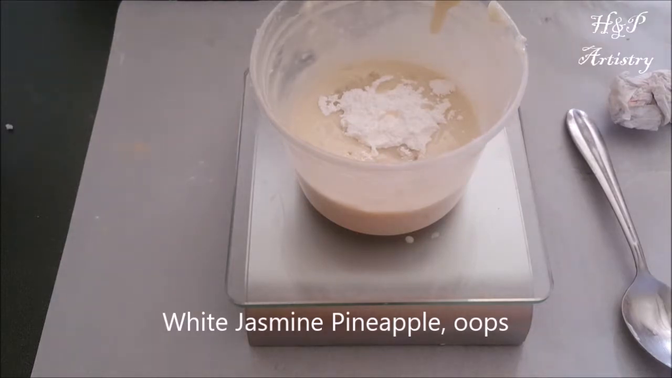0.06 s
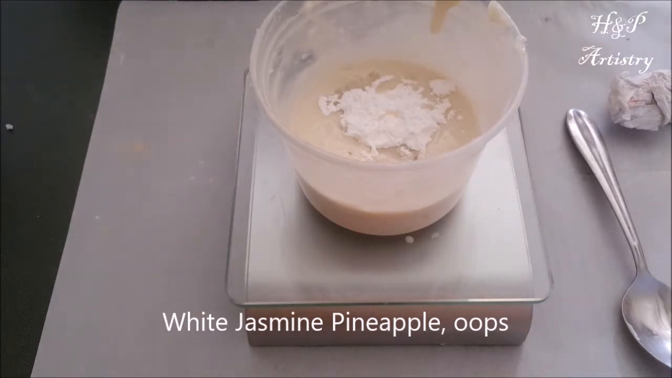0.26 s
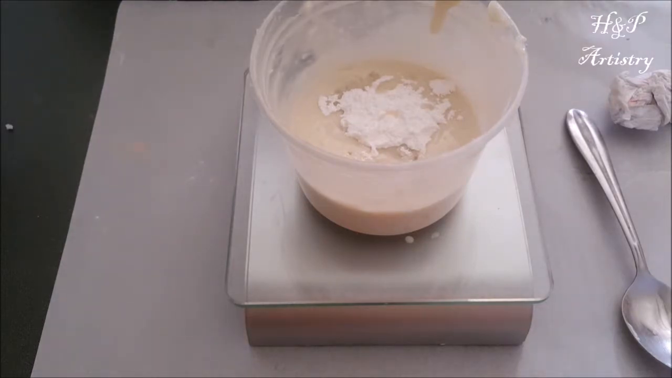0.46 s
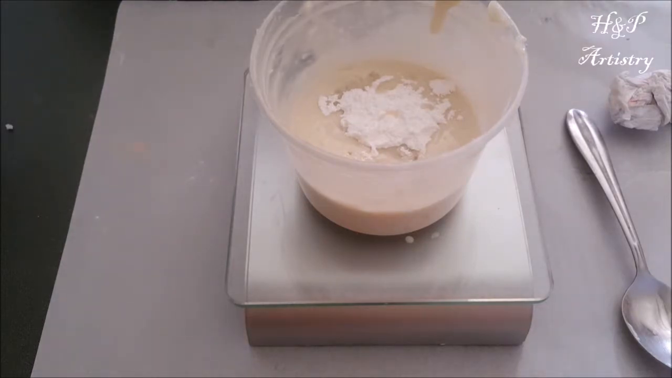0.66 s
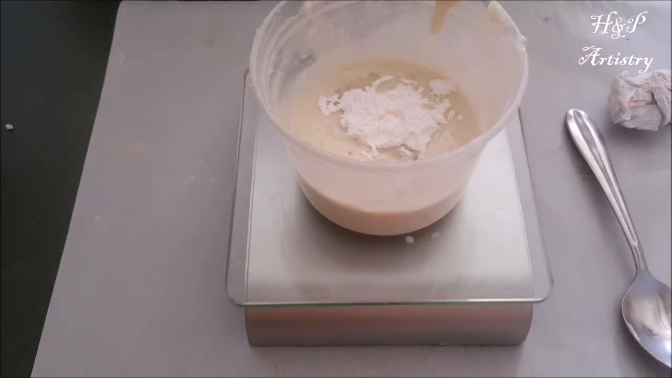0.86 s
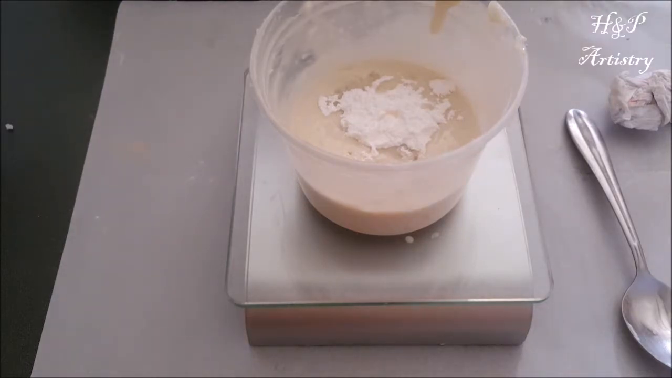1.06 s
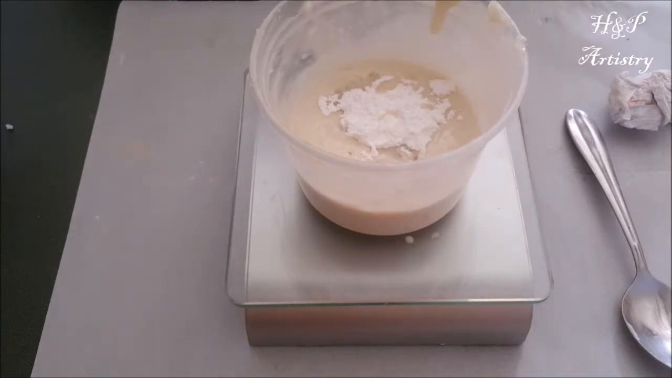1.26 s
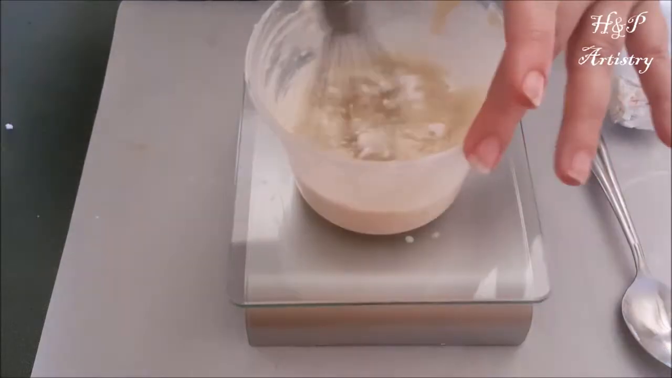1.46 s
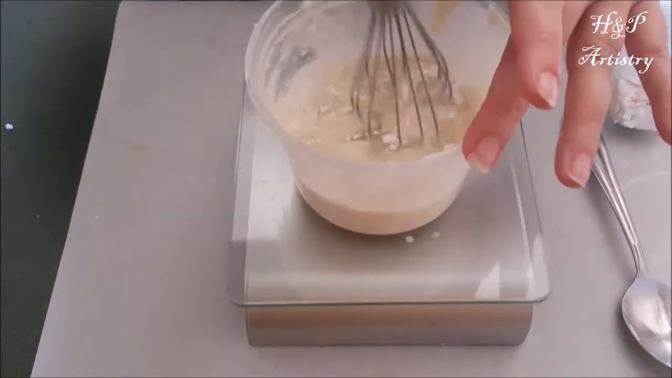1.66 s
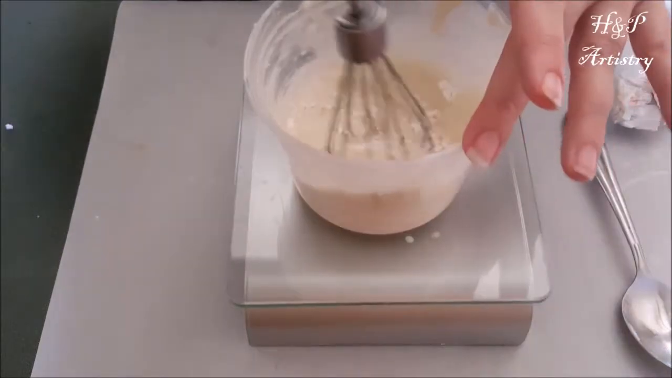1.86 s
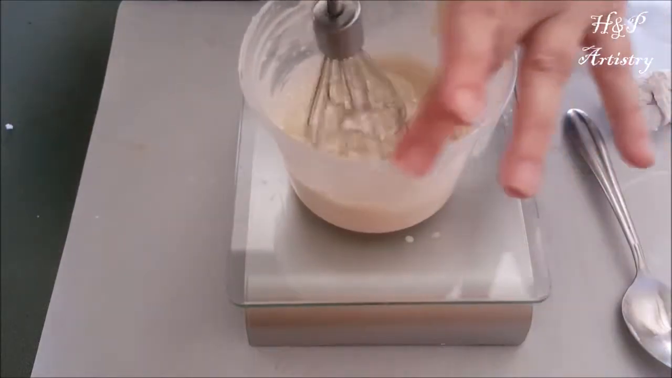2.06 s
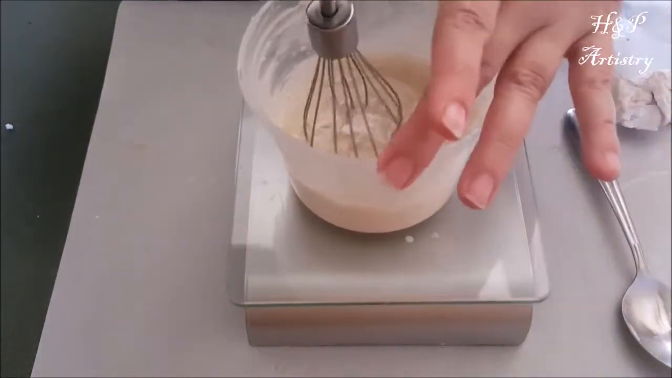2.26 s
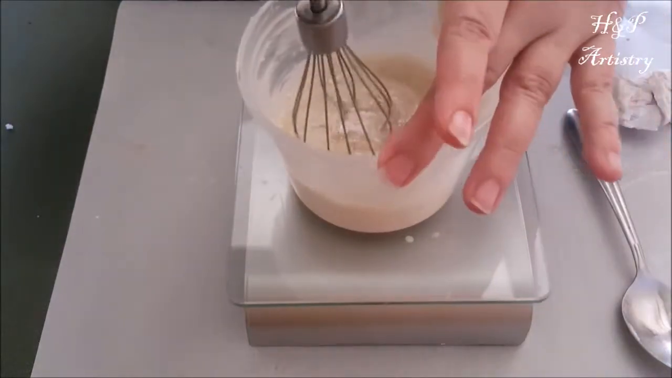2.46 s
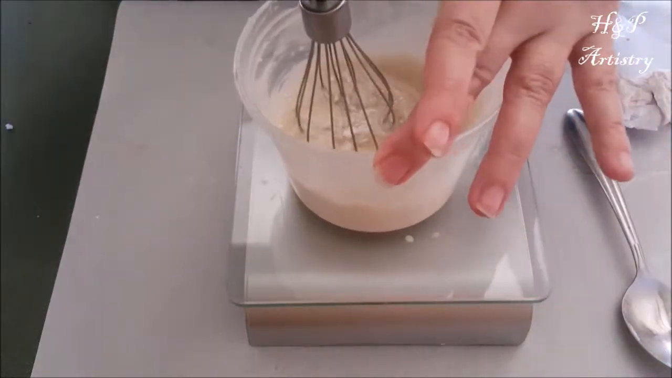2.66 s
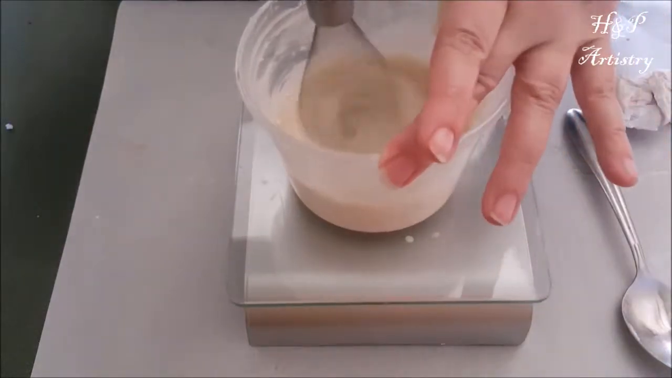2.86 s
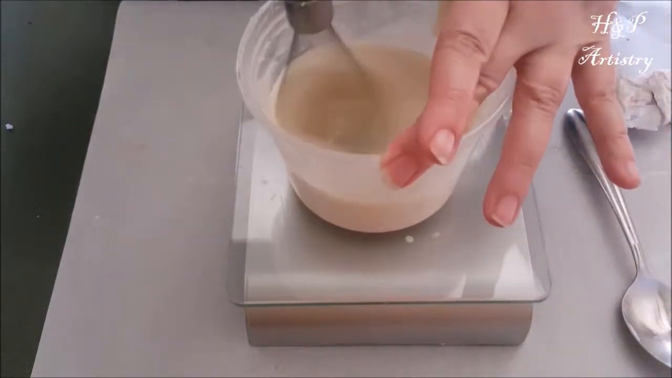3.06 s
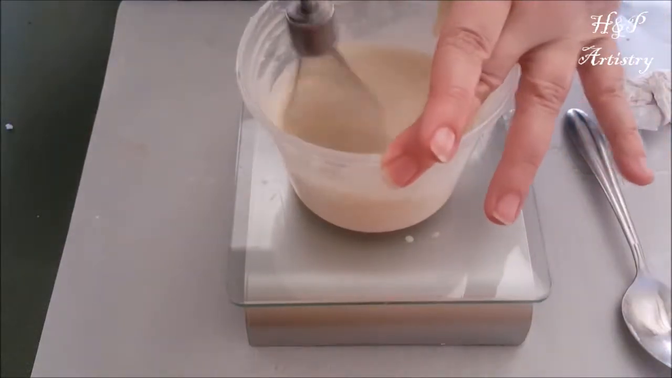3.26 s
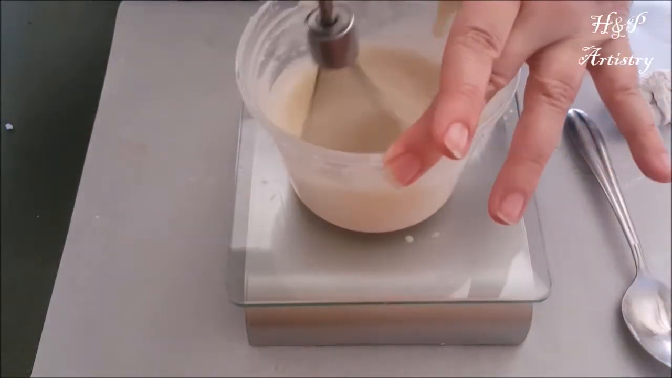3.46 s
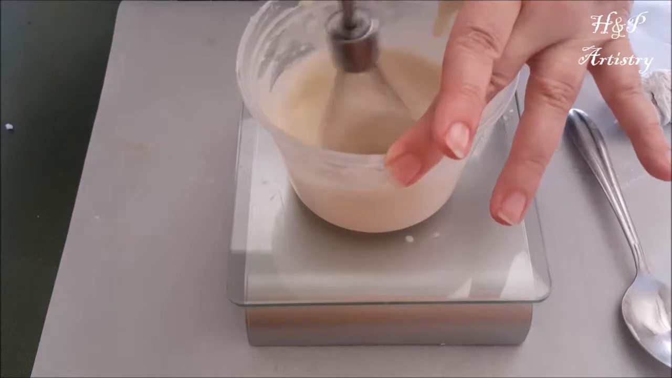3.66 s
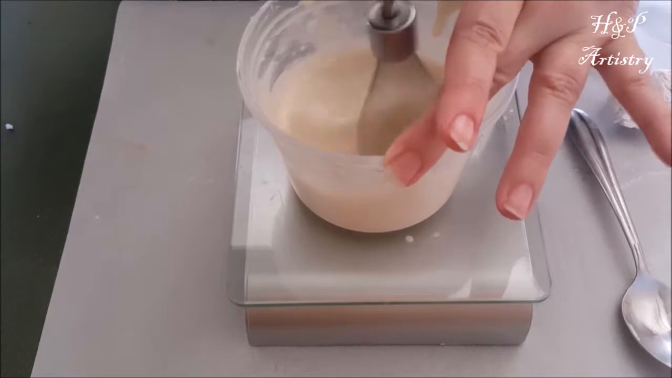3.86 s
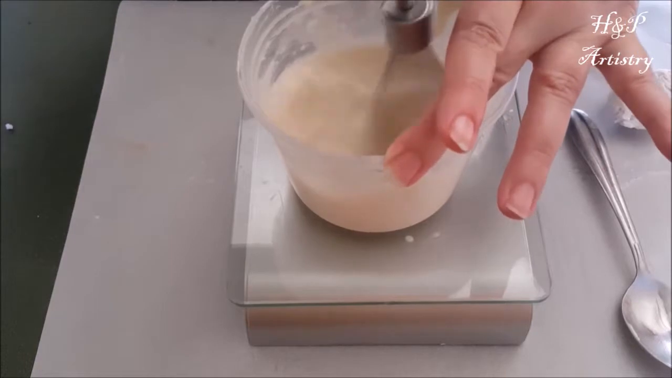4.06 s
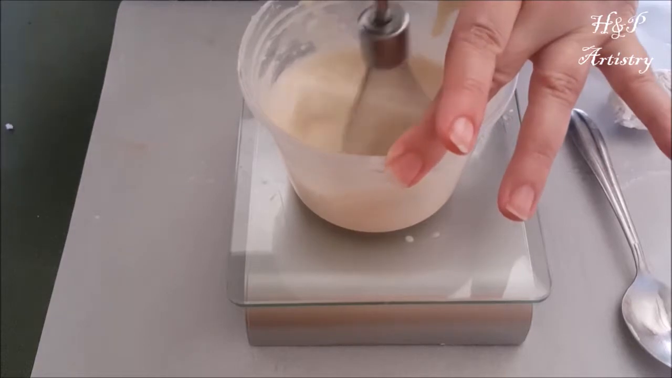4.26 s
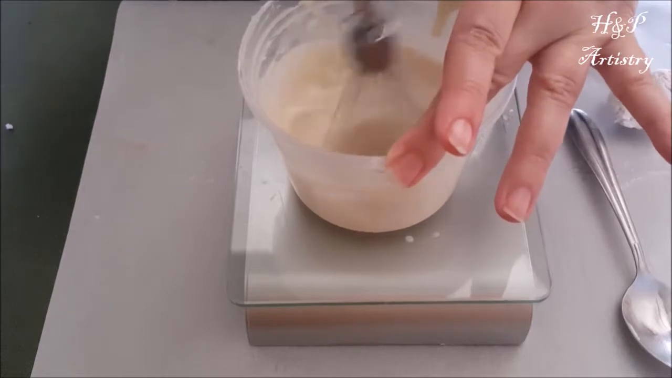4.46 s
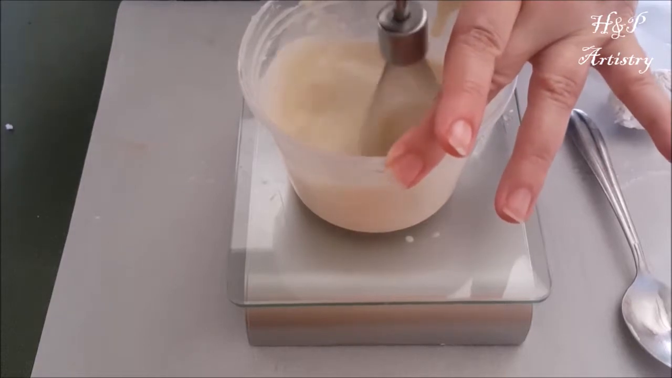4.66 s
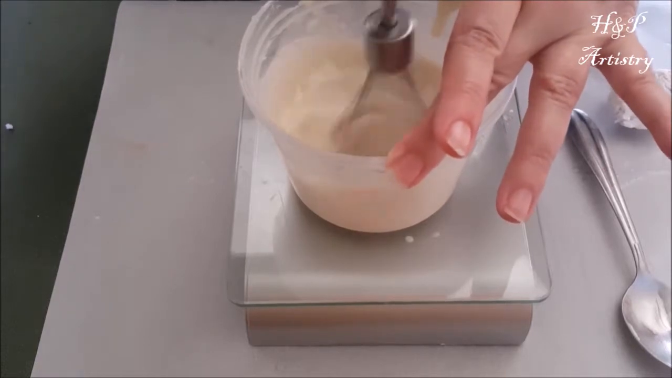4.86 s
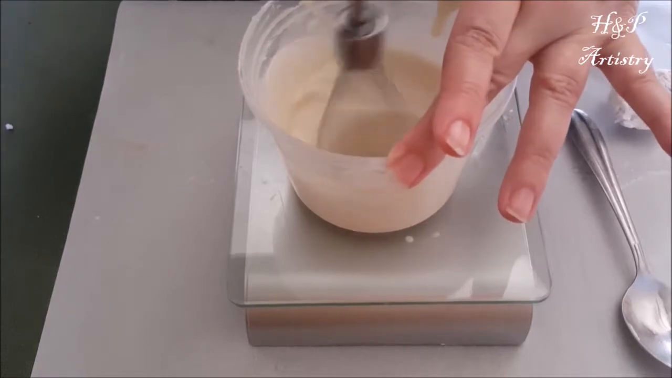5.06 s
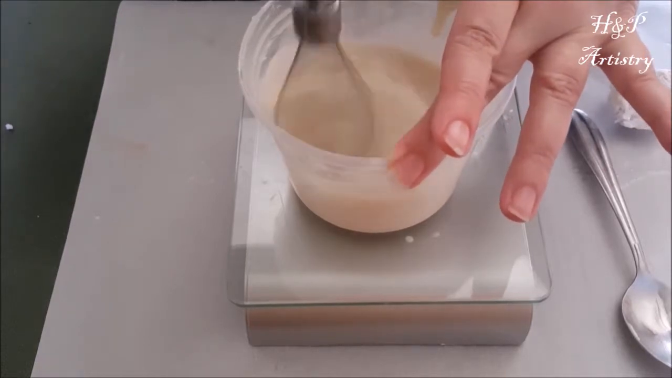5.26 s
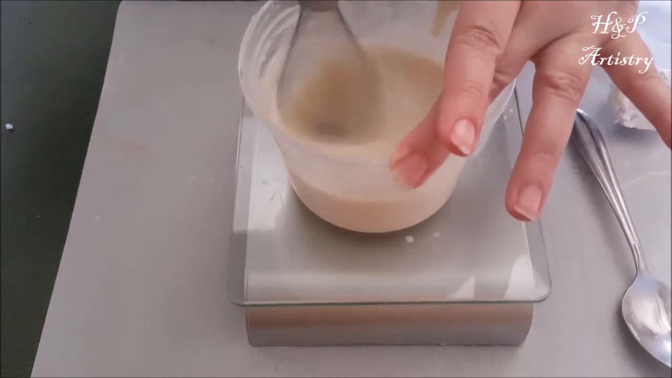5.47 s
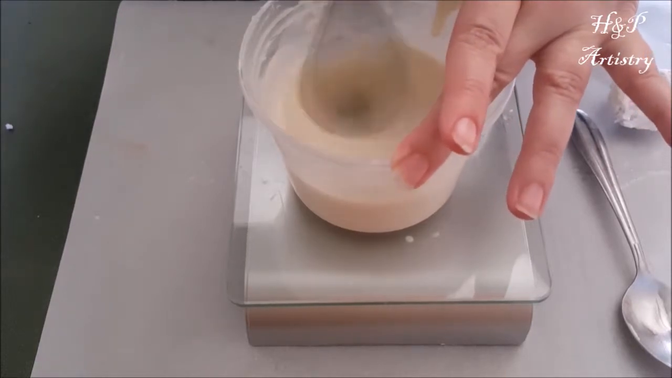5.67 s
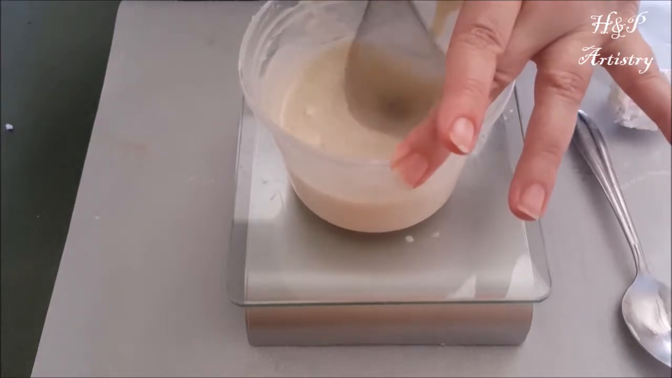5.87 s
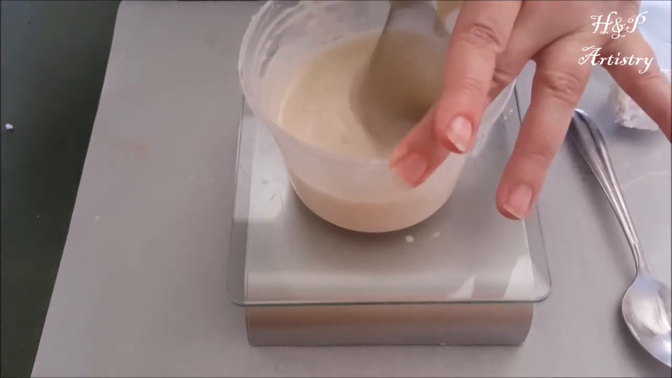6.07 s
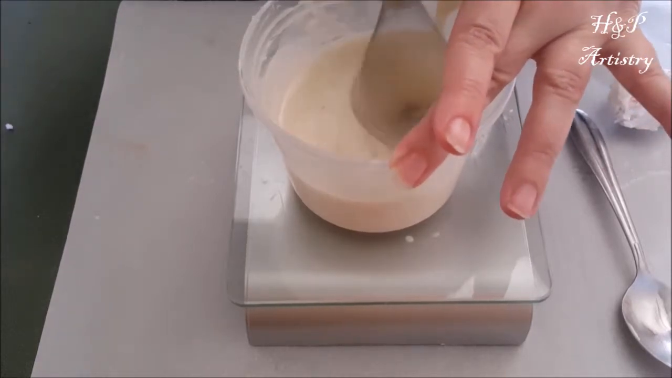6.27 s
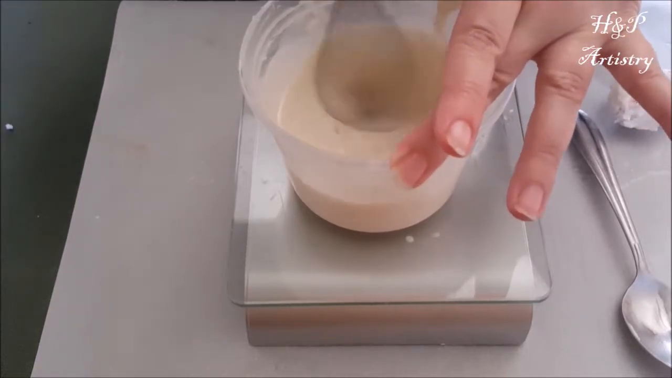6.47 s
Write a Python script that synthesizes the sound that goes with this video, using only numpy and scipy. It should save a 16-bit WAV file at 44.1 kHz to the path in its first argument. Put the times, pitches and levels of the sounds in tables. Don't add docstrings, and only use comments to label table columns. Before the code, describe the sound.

A wire whisk scrapes through flour and knocks a plastic cup, then an electric hand mixer jolts on, whines upward and runs steadily.

```python
import sys
import numpy as np
from scipy import signal
from scipy.fft import rfft, irfft, next_fast_len
from scipy.io import wavfile
from scipy.ndimage import uniform_filter1d, map_coordinates

SR = 44100
rng = np.random.default_rng(int(sys.argv[2]) if len(sys.argv) > 2 else 0)


def generate_wav(sig):
    pcm = np.round(np.clip(np.atleast_2d(sig).T, -1, 1) * 32767).astype(np.int16)
    wavfile.write(sys.argv[1], SR, pcm)


def ratio(d):
    e = np.asarray(d, float) / 20
    return 10 ** e


N = 287267
CRUISE = 270
MAINS_HZ = 120
# [f/Hz, correlation]
NEAR_ALIKE = [(60, 1), (300, 0.87), (700, 0.95), (1400, 0.51), (2500, 0.87), (5000, 0.083), (12000, 0.089)]


def unit(x):
    return x / np.sqrt(np.mean(x ** 2) + 1e-20)


def along(points, hz):
    f, v = np.transpose(points)
    return np.interp(np.log(hz + 1), np.log(f + 1), v)


def curves(rows):
    s, *cols = np.transpose(rows)
    return [np.interp(np.arange(N) / SR, s, c) for c in cols]


def wobble(rate):
    at = np.arange(0, N + 16, 16)
    knots = rng.standard_normal(int(N * rate / SR) + 4)
    return np.interp(np.arange(N), at, map_coordinates(knots, [at * rate / SR]))


def filtered(x, response):
    m = next_fast_len(N + SR // 2)
    return irfft(rfft(x, m) * response(np.fft.rfftfreq(m, 1 / SR)), m)[..., :N]


def shaped(spectrum):
    return lambda hz: ratio(along(spectrum, hz))


def rush(gain, alike, pulse=1):
    def mid_side_gain(hz):
        turn = np.arccos(np.clip(along(alike, hz), -1, 1)) / 2
        return gain(hz) * [np.cos(turn), np.sin(turn)]

    mid, side = filtered(pulse * rng.standard_normal((2, N)), mid_side_gain)
    return unit(np.array([mid + side, mid - side]))


def resonances(peaks, f):
    return sum(ratio(db) * 1j * f * w / (c * c - f * f + 1j * f * w) for c, w, db in peaks)


def ring(modes, t, scatter_db):
    out = 0
    for hz, db, t60 in modes:
        level = ratio(db + scatter_db * rng.standard_normal() - 60 * t / t60)
        out = out + level * np.sin(2 * np.pi * hz * t)
    return out


def burst(t, lo_hz, hi_hz, t60):
    band = signal.butter(2, [lo_hz, hi_hz], "bandpass", fs=SR, output="sos")
    return unit(signal.sosfilt(band, rng.standard_normal(len(t)))) * ratio(-60 * t / t60)


def room(x):
    # [f/Hz, t60/s]
    decay = [(200, 0.26), (1000, 0.29), (4000, 0.15), (12000, 0.013)]
    hz, t, z = signal.stft(rng.standard_normal((2, SR // 3)), SR, nperseg=256)
    tail = signal.istft(z * ratio(-60 * t / along(decay, hz)[:, None]), SR, nperseg=256)[1]
    late = np.pad(x, (250, 0))[None]
    return signal.fftconvolve(late, tail / np.linalg.norm(tail[0]), axes=1)[:, :len(x)]


def kitchen():
    # [f/Hz, level/dB]
    floor = [(20, -3), (40, -25), (65, -7.5), (95, -16), (190, -18), (300, -23.5), (700, -25), (950, -31),
             (1650, -19), (2600, -25.5), (4200, -36), (9000, -42), (13000, -41), (16000, -40)]
    # [f/Hz, correlation]
    floor_alike = [(60, 0.9), (240, 0.51), (950, 0.13), (3770, -0.21), (15000, -0.15)]
    # [f/Hz, level/dB]
    fridge = [(118.4, -70.5)]
    t, hum = np.arange(N) / SR, 0
    for hz, db in fridge:
        level = ratio(db + 1.0 * wobble(3.4)) * np.sqrt(2)
        hum = hum + level * np.sin(2 * np.pi * hz * t + 0.18 * wobble(5.5))
    return ratio(-65.5) * rush(shaped(floor), floor_alike) + hum * ratio([[1.3], [-1.3]])


def whisk_drag():
    # [t/s, level at the height/dB]
    strokes = [
        (1.52, -71.5),
        (1.9, -75),
        (2.14, -63.5),
        (2.3, -67),
        (2.55, -77),
        (2.75, -67.5),
    ]
    # [f/Hz, level/dB per Hz]
    wire_colour = [(200, -58), (500, 6.5), (2500, 0.5), (4500, -7), (6500, -12), (8500, -8), (10000, -15),
                   (16000, -10)]
    rises_db_per_s, falls_db_per_s = 167, 70
    t, drag = np.arange(N) / SR, 0
    for s, db in strokes:
        drag = drag + ratio(db - np.where(t < s, rises_db_per_s * (s - t), falls_db_per_s * (t - s)))
    catches = ratio(2.0 * wobble(40) + 2.3 * wobble(440))
    return drag * ratio(5.0) * rush(shaped(wire_colour), NEAR_ALIKE, catches)


def bright_ticks():
    # [t/s, peak/dB]
    ticks = [(1.51, -61), (1.5808, -63), (1.7938, -53), (1.9744, -67), (2.0532, -43), (2.1246, -58),
             (2.5097, -59), (2.5375, -46), (2.6165, -53), (2.6768, -61), (2.7257, -63), (2.784, -35)]
    out, t = np.zeros(N), np.arange(SR // 20) / SR
    for s, db in ticks:
        out[round(s * SR):][:len(t)] += ratio(db - 1.5) * burst(t, 5200, 15000, 0.021)
    return out


def cup():
    # [t/s, peak/dB, thump/dB, wall/dB, wire tick/dB]
    knocks = [(1.5102, -28.5, -0.5, -8, -25), (1.793, -27, -5, -6, -34), (1.954, -62, 6, -4, -8),
              (2.041, -52, -2, -18, -21), (2.0521, -23, -3.5, -10, -21), (2.124, -52, -9, 3, 7),
              (2.143, -33.5, -14, -16, -26), (2.171, -48.5, -2, -17, -19), (2.31, -47, -31, -1, -1),
              (2.361, -53, -20, -15, -11), (2.466, -64, -6, -9, -17), (2.509, -40, -22, -3, -26),
              (2.537, -36, -20, -7, -6.5), (2.576, -59, -11.5, -14, -19), (2.653, -57, -1, -11, -10),
              (2.675, -44, -20, -7, -21), (2.727, -46, -26, 0, -11)]
    # [f/Hz, level/dB, t60/s]
    base = [(342, -15, 0.017), (425, 0, 0.03), (163, -12, 0.044)]
    # [f/Hz, level/dB, t60/s]
    rim = [(636, 4, 0.017), (884, -6.5, 0.025), (1140, -2.5, 0.019)]
    # [f/Hz, level/dB, t60/s]
    air = [(556, -2.5, 0.086)]
    # [f/Hz, level/dB, t60/s]
    wall = [(985, -7, 0.052), (1404, 0, 0.019), (1564, -3, 0.03), (2140, -8, .025), (2480, -10, 0.027)]
    rebound_s, rebound_db, contact_s = 0.0033, -4, 0.0013
    plate_db, plate_t60 = -22, 0.16
    out, t = np.zeros((2, N + SR)), np.arange(SR // 4) / SR
    for s, db, thump_db, wall_db, tick_db in knocks:
        pressed = t * (1 + 0.02 * rng.standard_normal())
        body = ratio(thump_db + 11) * ring(base, pressed, scatter_db=4.0)
        body = body + 0.98 * ring(rim, pressed, scatter_db=2.0)
        body = body + ratio(-0.45 * (thump_db + 24)) * ring(air, pressed, scatter_db=3.0)
        crack = ratio(-0.5) * ring(wall, pressed, scatter_db=2.5) + ratio(-2) * burst(t, 1200, 2460, 0.02)
        body = body + ratio(wall_db) * crack
        body = body + ratio(rebound_db) * np.interp(t - rebound_s, t, body, left=0)
        blow = body * (1 - np.exp(-t / contact_s))
        blow = blow + ratio(plate_db) * burst(t, 350, 1230, plate_t60)
        blow = blow + ratio(tick_db - 6.0) * burst(t, 2700, 5800, 0.021)
        blow = ratio(db) * blow
        out[:, round(s * SR):][:, :len(t)] += blow + ratio(-14.5) * room(blow)
    no_bass = signal.butter(2, 130, "highpass", fs=SR, output="sos")
    return signal.sosfilt(no_bass, out[:, :N])


def effort(speed):
    # [t/s, level/dB]
    digging = [(3.2, -45.5), (3.52, -44.5), (4.43, -36.5), (4.5, -42), (4.68, -34.5), (4.88, -40.5),
               (5.02, -37.5), (5.04, -41), (5.66, -47.5), (5.78, -46.5), (6.3, -40.5), (6.51, -42.5)]
    (dig_db,), decades = curves(digging), np.log10(speed / CRUISE)

    def grows(cruise_db, db_per_decade, floor_db, dig_share):
        dug = dig_share * (dig_db - dig_db.max())
        return ratio(cruise_db + db_per_decade * decades + dug) + ratio(floor_db)

    snatch = ratio(-33) * np.exp(-((np.arange(N) / SR - 2.84) / 0.03) ** 2)
    churn = ratio(dig_db + 60 * np.minimum(decades + 0.085, 0))
    rattle = grows(-30, 77, -32, 0.22)
    housing = grows(-23.5, 66, -85, 0.11) + snatch
    hiss = grows(-34.5, 100, -43, 0.19)
    return [20 * np.log10(g) for g in (churn, rattle, housing, hiss)]


def orders(family, db, turns, unsteady_db, gains=None, rate=25):
    t, out = np.arange(N) / SR, 0
    for i, (order, side, rel_db) in enumerate(family):
        cycles = round(order) * turns + MAINS_HZ * np.sign(side) * t + rng.random()
        phase = 2 * np.pi * (cycles % 1)
        level = ratio(np.float32(rel_db + unsteady_db * wobble(rate)))
        if gains is not None:
            level = level * gains[i]
        out = out + level * np.sin(np.float32(phase))
    return out * ratio(db) * np.sqrt(2)


def spun_db(speed):
    return 60 * np.log10(np.minimum(speed / 248, 1))


def gear_jolts():
    # [t/s, level/dB]
    jolts = [
        (2.7815, -13.5),
        (2.799, -9),
        (2.809, -3),
        (2.816, -0.5),
        (2.824, -2.5),
    ]
    # [f/Hz, level/dB, t60/s]
    handle = [(580, 2.5, 0.022), (810, 0.5, 0.038), (2070, 2.5, 0.022), (2500, -11, 0.039),
              (3210, -11, 0.018)]
    out, t = np.zeros(N), np.arange(SR // 4) / SR
    for s, db in jolts:
        blow = ratio(db - 10) * ring(handle, t, scatter_db=2.0)
        out[round(s * SR):][:len(t)] += blow * (1 - np.exp(-t / 0.0017))
    return out


def shaft_unbalance(speed, turns):
    # [shaft order, mains sideband, level/dB]
    unbalance = [(1, 0, 0), (1, 1, -27)]
    # [f/Hz, width/Hz, level/dB]
    grip = [(266.5, 25.5, -0.5)]
    rock = (speed / CRUISE) ** 2 * abs(resonances(grip, speed))
    return orders(unbalance, -21, turns, unsteady_db=0.57, gains=[rock, rock])


def gear_mesh(speed, turns):
    # [shaft order, mains sideband, level/dB]
    teeth = [(10, 0, 0), (10, 1, -7), (15, 0, -14), (20, 0, -24), (11, 0, -17)]
    # [f/Hz, width/Hz, level/dB]
    gearbox = [(2720, 380, 0)]
    mesh = abs(resonances(gearbox, 10 * speed))
    return orders(teeth, -31.5 + spun_db(speed), turns, unsteady_db=2.0, gains=[mesh] * len(teeth))


def slot_whine(speed, turns):
    # [shaft order, mains sideband, level/dB]
    slots = [(12, -1, 0), (12, 0, 0), (12, 1, -4)]
    # [f/Hz, width/Hz, level/dB]
    casing = [(650, 120, -0.5), (1140, 240, -4), (1650, 130, 3.5), (2090, 110, 5), (2500, 190, 1.5),
              (2836, 204, 12.5), (3050, 170, 0.5)]
    standstill_db, eases_db = -21.5, 24.5
    slot_hz = [abs(12 * speed + MAINS_HZ * np.sign(side)) for _, side, _ in slots]
    lift = [abs(resonances(casing, hz)) / (1 + (hz / 3200) ** 24) for hz in slot_hz]
    level_db = standstill_db - eases_db * speed / CRUISE
    return orders(slots, level_db, turns, unsteady_db=3.0, gains=np.power(lift, 1.3))


def commutator_tone(speed, turns):
    # [shaft order, mains sideband, level/dB]
    bars = [(24, 0, 0), (24, -1, -15)]
    # [f/Hz, width/Hz, level/dB]
    vents = [(2930, 230, 8.5), (6455, 150, 0), (6640, 130, -5.5)]
    vent = abs(resonances(vents, 24 * speed)) ** 2
    return orders(bars, -43.5, turns, unsteady_db=2.0, gains=[vent, vent])


def gear_knocking(speed, turns, rattle_db):
    # [shaft order, mains sideband, level/dB re rattle]
    knocking = [(2, 0, -14.5), (3, 0, -13.5), (4, 0, -21), (5, 0, -22)]
    pulling_db = 5 * np.clip((268 - speed) / 15, 0, 1)
    return orders(knocking, rattle_db + 1.5 * spun_db(speed) + pulling_db, turns, unsteady_db=4.0)


def brush_tones(turns, hiss_db):
    # [shaft order, mains sideband, level/dB re hiss]
    spark_lines = [(23, 0, -26), (27, 0, -24), (28, 0, -25), (29, 0, -26), (32, 0, -26), (34, 0, -27),
                   (36, 0, -26), (42, 0, -29), (46, 0, -28), (47, 0, -27), (49, 0, -28)]
    return orders(spark_lines, hiss_db + 3, turns, unsteady_db=4, rate=3.13)


def batter_churn(churn_db):
    # [f/Hz, level/dB per Hz]
    churn_colour = [(13, -57), (22, -18), (48, -20), (129, -1), (226, -12.5), (240, -6), (310, -8),
                    (530, -120)]
    return ratio(churn_db + 1.0) * rush(shaped(churn_colour), NEAR_ALIKE, ratio(0.9 * wobble(13)))


def gear_rattle(speed, rattle_db, teeth_pulse):
    # [f/Hz, level/dB per Hz]
    rattle_colour = [(90, -56), (160, -4), (300, -4), (550, 1), (800, -1), (1100, -3), (1350, -6),
                     (1600, -0.5), (1850, -8.5), (3200, -7), (4000, -102)]
    rumble_hz, rumble_speed = 527, 238
    rattle = ratio(rattle_db + 0.56) * rush(shaped(rattle_colour), NEAR_ALIKE, teeth_pulse)
    missing = np.clip(1 - (speed / rumble_speed) ** 2, 0, 1)
    return rattle - missing * filtered(rattle, lambda f: 1 / (1 + (f / rumble_hz) ** 4))


def housing_ring(speed, housing_db, teeth_pulse):
    # [f/Hz, width/Hz, level/dB]
    housing_peaks = [(2090, 270, -4.5), (2312, 208, 2.5), (2546, 98, -12)]
    # [f/Hz, width/Hz, level/dB]
    shell = [(2585, 330, 0)]
    shell_db, db_per_decade = -37, 520
    housing = rush(lambda f: resonances(housing_peaks, f) ** 1.81 * (f > 250), NEAR_ALIKE, teeth_pulse)
    singing = rush(lambda f: resonances(shell, f) ** 2, NEAR_ALIKE, teeth_pulse)
    sing_gain = ratio(shell_db + db_per_decade * np.log10(speed / CRUISE))
    return ratio(housing_db + 0.93) * housing + sing_gain * singing


def patchy(x, depth_db):
    z = signal.stft(x, nperseg=512)[2]
    field = uniform_filter1d(rng.standard_normal(z.shape[1:]), size=5, axis=0)
    field = uniform_filter1d(field, size=40, axis=1)
    return signal.istft(z * ratio(depth_db * unit(field)), nperseg=512)[1][:, :N]


def brush_hiss(hiss_db, spark_pulse):
    # [f/Hz, level/dB per Hz]
    hiss_colour = [(1760, -12), (3000, -3), (3760, -7.5), (4130, -5.5), (4650, -4.5), (6050, -13),
                   (6540, -11), (7020, -15.5), (8560, -10), (9320, -16.5), (14800, -16), (15600, -18),
                   (16300, -46)]
    hiss = rush(lambda f: shaped(hiss_colour)(f) * (f > 900), NEAR_ALIKE, spark_pulse)
    return ratio(hiss_db + 3.0) * patchy(hiss, depth_db=1.0)


def motor():
    # [t/s, shaft turns/s]
    run_up = [(2.775, 28.0), (2.815, 51.2), (2.86, 96.0), (2.94, 156.0), (3.0, 180.0), (3.08, 206.0),
              (3.18, 224.9), (3.3, 239.7), (3.5, 252.6), (3.8, 264.0), (4.05, 269.5), (4.35, 268.4),
              (4.65, 270.8), (4.8, 269.3), (5.1, 269.9), (5.4, 275.4), (6.0, 280.3), (6.45, 276.9)]
    speed, = curves(run_up)
    t = np.arange(N) / SR
    shake = 0.002 * wobble(60) + 0.012 * np.clip(1 - speed / 200, 0, 1) * wobble(250)
    turns = np.cumsum(speed) / SR + shake
    churn_db, rattle_db, housing_db, hiss_db = effort(speed)

    tones = gear_jolts() + shaft_unbalance(speed, turns) + gear_mesh(speed, turns)
    tones = tones + slot_whine(speed, turns) + commutator_tone(speed, turns)
    tones = tones + gear_knocking(speed, turns, rattle_db) + brush_tones(turns, hiss_db)

    shaft, mains = np.cos(2 * np.pi * turns), np.cos(2 * np.pi * MAINS_HZ * t)
    load = 0.3 * wobble(20)
    teeth_pulse = ratio(0.6 * shaft + 0.9 * mains + load)
    spark_pulse = ratio(0.9 * shaft + 0.5 * mains + load + 0.4 * wobble(700))
    noise = batter_churn(churn_db) + gear_rattle(speed, rattle_db, teeth_pulse)
    noise = noise + housing_ring(speed, housing_db, teeth_pulse) + brush_hiss(hiss_db, spark_pulse)

    on = np.clip((t - 2.779) / 0.006, 0, 1)
    answer = ratio(-17) * room(filtered(on * tones, lambda hz: hz > 400))
    return on * (tones + answer + noise)


def scene():
    # [f/Hz, left minus right/dB]
    lean = [(60, 0.0), (110, 0.5), (230, 4.8), (500, 1.3), (1290, 1.4), (2380, -0.6), (4400, -5.0),
            (10000, -1.5)]

    def lead(hz):
        half_log_gain = along(lean, hz) / 2 / 20 * np.log(10)
        return half_log_gain + 1j * np.pi * hz * 3.7e-5

    near = whisk_drag() + bright_ticks() + cup() + motor()
    return kitchen() + filtered(near, lambda hz: np.exp([lead(hz), -lead(hz)]))


def top_cut(x):
    return signal.sosfilt(signal.butter(12, 16480, fs=SR, output="sos"), x)


def record(dry):
    mix = filtered(dry, lambda hz: hz < 15730)
    return top_cut(mix)


dry = scene()
out = record(dry)
generate_wav(out)
```